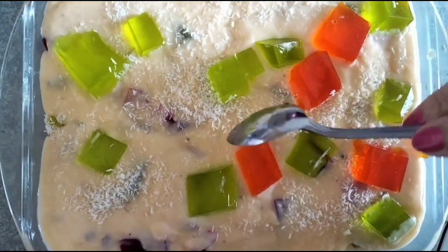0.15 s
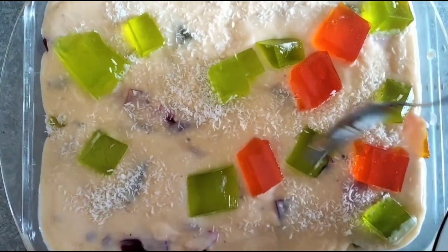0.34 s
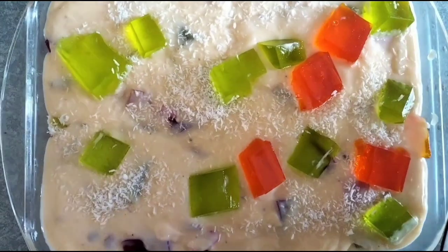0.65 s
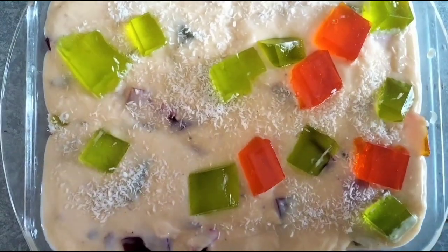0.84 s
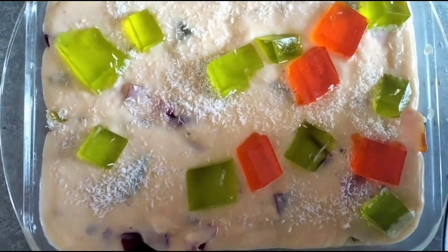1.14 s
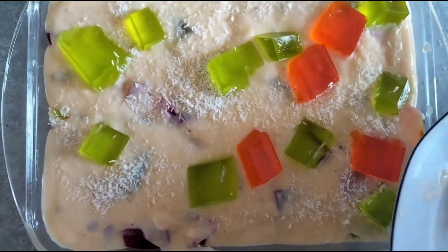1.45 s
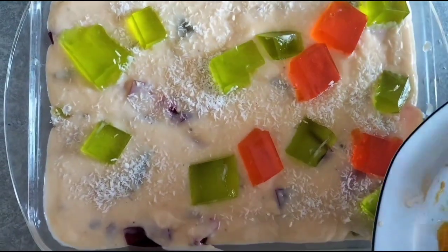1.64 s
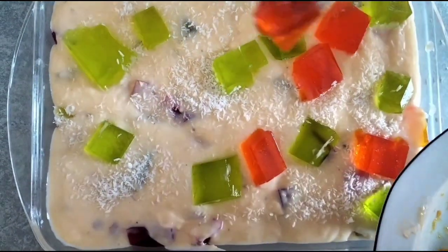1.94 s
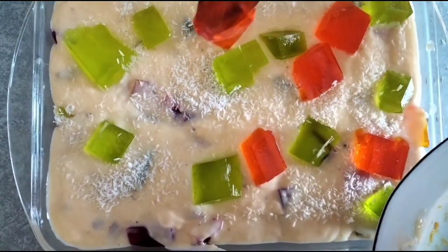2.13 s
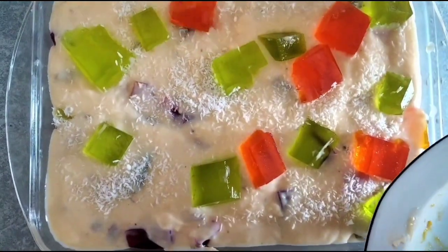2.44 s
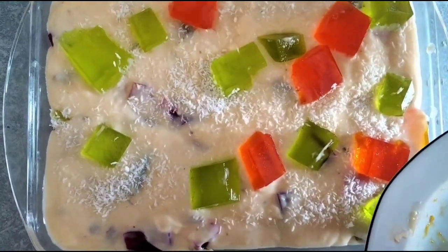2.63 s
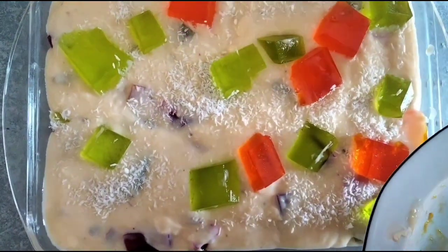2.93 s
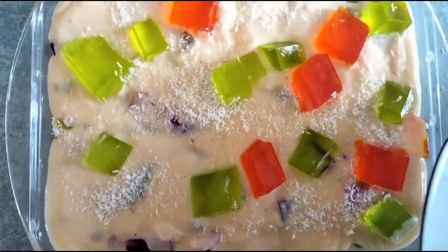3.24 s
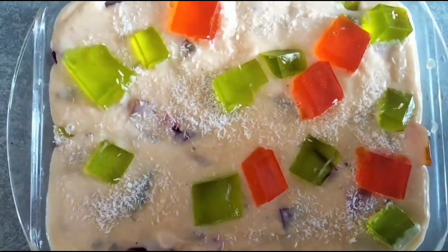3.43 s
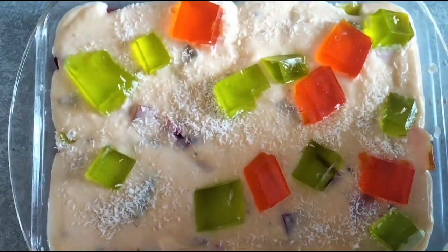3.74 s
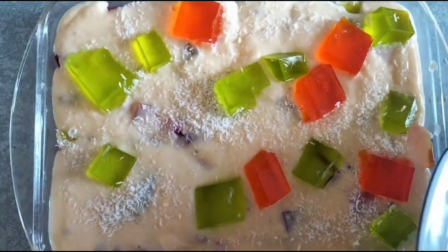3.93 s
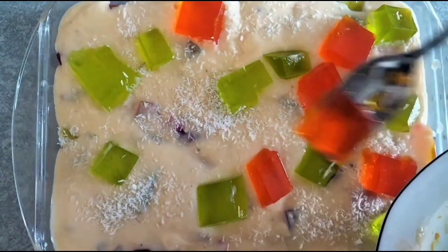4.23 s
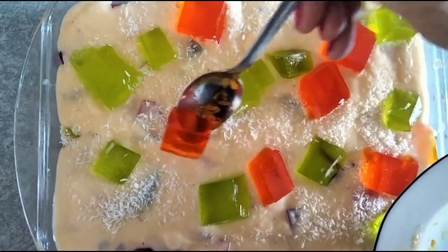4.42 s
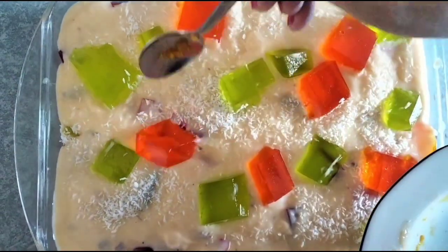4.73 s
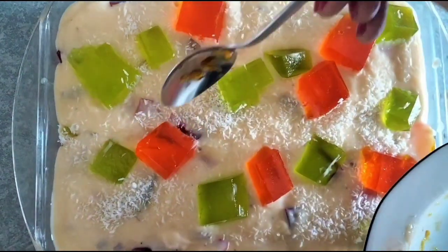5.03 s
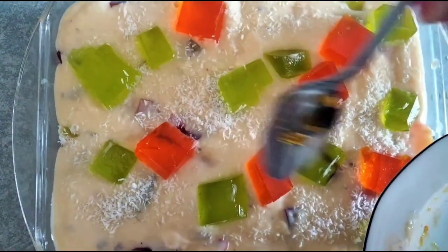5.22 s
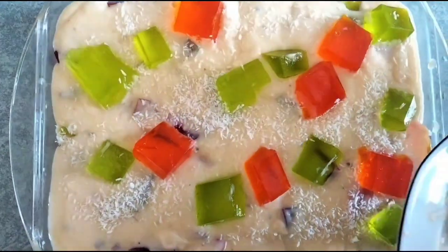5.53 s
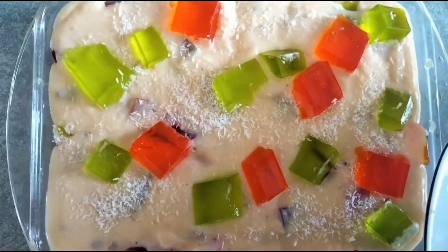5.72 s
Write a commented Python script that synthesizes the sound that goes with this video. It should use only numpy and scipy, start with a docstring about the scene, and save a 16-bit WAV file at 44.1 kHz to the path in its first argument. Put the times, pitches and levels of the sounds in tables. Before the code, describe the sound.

Short, bright spoon clinks against a dish, a close pair and later a single one, while a distant appliance hums quietly throughout.

```python
"""A steel spoon knocks three times on a glazed dish in a small kitchen, picking up jelly cubes.
Each contact is a crack of coloured noise plus ringing modes, damped quickly by the food and the hand.
Light bounces follow, the tip drags in small slips, and a cube slides off as one soft swelling tone.
Late on, a few low handling bumps reach the microphone. From across the room an appliance whirs
throughout, made of resonant noise; decaying noise bands give the kitchen's reflections."""
import sys
import numpy as np
from scipy import signal
from scipy.fft import rfft, irfft, next_fast_len
from scipy.io import wavfile

SR = 44100
rng = np.random.default_rng(int(sys.argv[2]) if len(sys.argv) > 2 else 0)


def log_audio(samples):
    """Write samples as a 16-bit WAV file to the path given in sys.argv[1]."""
    # one column per channel
    frames = np.atleast_2d(samples).T
    # limit to full scale, then quantise
    limited = np.clip(frames, -1, 1)
    pcm = np.round(limited * 32767).astype(np.int16)
    wavfile.write(sys.argv[1], SR, pcm)


N = 258867

# firm knocks of spoon on dish:
# (t/s, relative level/dB, part of the spoon, share of the free ring time, relative crack level/dB)
FIRM_KNOCKS = [(1.265, -0.5, "edge", 0.9, -22), (1.5077, 1.5, "back", 0.55, -33),
               (3.7934, -1.5, "tip", 0.94, -19.5)]
# all three land near one spot, which favours modes around one pitch
KNOCK_SPOT_HZ, KNOCK_SPOT_BOOST_DB = 3890, 2.5


def knocks():
    """The spoon meets the dish firmly with its edge, back or tip."""
    out = np.zeros(N)
    for start_s, strength_db, part, ring_share, crack_db in FIRM_KNOCKS:
        knock = clink(part, ring_share, crack_db, KNOCK_SPOT_HZ, KNOCK_SPOT_BOOST_DB)
        add(out, start_s, from_db(strength_db) * knock)
    return out


# the loosely held spoon falls back on the dish:
# (t/s, relative level/dB, part of the spoon, share of the free ring time, relative crack level/dB,
#  pitch favoured by the touched spot f/Hz)
LIGHT_BOUNCES = [(1.333, -15, "edge", 0.84, -37, 3434), (1.4338, -35, "back", 0.95, -20.5, 4480),
                 (1.6190, -27, "back", 0.74, -32, 3940), (1.6262, -22.5, "back", 0.48, -35, 2380),
                 (4.0475, -40, "edge", 0.65, -16, 9400), (4.0628, -36.5, "edge", 0.96, -16, 2370)]
BOUNCE_CRACK_T60_S, BOUNCE_SPOT_BOOST_DB = 0.047, 17.5


def bounces():
    """Light touches start more softly than knocks and wake mainly the modes of the touched spot."""
    out = np.zeros(N)
    for start_s, strength_db, part, ring_share, crack_db, spot_hz in LIGHT_BOUNCES:
        touch = clink(part, ring_share, crack_db, spot_hz, BOUNCE_SPOT_BOOST_DB,
                      rise_s=0.0015, crack_t60_s=BOUNCE_CRACK_T60_S)
        add(out, start_s, from_db(strength_db) * touch)
    return out


DRAG_START_S, DRAG_LENGTH_S, DRAG_DB = 3.930, 0.1, -38
SLIP_RING_SHARE, SLIP_CRACK_DB = 0.74, -23
SLIP_SPOT_HZ, SLIP_SPOT_BOOST_DB = 2370, 21.5   # the slips bring out one low mode
SLIP_JITTER, SLIP_SPREAD_DB = 0.15, 0.8   # share of the gap between slips; scatter of their strength


def drag(count=10):
    """The tip sticks and slips over the glaze at an uneven pace; the small rings run together."""
    out = np.zeros(N)
    for k, (late, firm) in enumerate(rng.standard_normal((count, 2))):
        progress = (k + SLIP_JITTER * late) / count
        start_s = DRAG_START_S + DRAG_LENGTH_S * progress
        strength_db = DRAG_DB + SLIP_SPREAD_DB * firm
        slip = clink("tip", SLIP_RING_SHARE, SLIP_CRACK_DB, SLIP_SPOT_HZ, SLIP_SPOT_BOOST_DB,
                     rise_s=0.00091)
        add(out, start_s, from_db(strength_db) * slip)
    return out


# spoon and dish ringing together, before damping, detuning and the boost of the touched spot:
# (f/Hz, t60/s, relative level/dB by the spoon's edge, by its back, by its tip)
DISH_MODES = [ (745, 0.021, -36, -53, -28.5), (854, 0.071, -37.5, -38, -33), (1357, 0.022, -32, -32, -22.5),
              (1430, 0.068, -34.5, -41, -39), (1644, 0.023, -61, -30, -26), (1810, 0.043, -34, -36, -40),
              (2256, 0.17, -37, -40.5, -42.5), (2322, 0.081, -32, -35, -31), (2866, 0.035, -64, -47, -26),
              (2980, 0.031, -79, -53, -25), (3160, 0.041, -48.5, -47, -39), (3370, 0.14, -31.5, -35.5, -33),
              (3610, 0.052, -24, -21.5, -51), (3706, 0.023, -32, -12, -12.5), (3930, 0.072, -15, -31, -14),
              (4340, 0.045, -50.5, -25.5, -49.5), (4480, 0.059, -52, -61, -28),
              (4810, 0.037, -24, -32, -31.5), (5040, 0.03, -52.5, -46, -27.5), (5600, 0.041, -27, -29, -63),
              (6010, 0.045, -25.5, -35, -30), (6750, .03, -36, -57, -43), (6870, 0.073, -38, -43.5, -37.5),
              (6970, 0.099, -35, -39.5, -40.5), (8330, 0.039, -39, -62, -33),
              (8840, 0.052, -40, -51, -31.5), (8920, 0.052, -62.5, -55, -32.5), (9520, .04, -40, -71, -50),
              (13800, 0.012, -37, -64, -34.5), (14400, 0.015, -37, -60, -34)]
# colour of the crack of steel on glaze: (f/Hz, relative level/dB per Hz)
CRACK_COLOUR = [(100, -27.5), (350, -3), (560, -17), (820, -1), (1700, 0.5), (1980, -23.5), (2400, 7),
                (4200, -4.5), (6800, 0), (7600, -15.5), (8700, -8.5), (11000, -17), (14500, -19),
                (16000, -21)]
# crowded upper modes heard within the crack: (f/Hz, half width/Hz, boost level/dB)
CRACK_HUMPS = [(10560, 350, 6.5), (12100, 530, 8.5), (14300, 450, 4)]


def clink(part, ring_share, crack_db, spot_hz, spot_boost_db,
          rise_s=0.0012, crack_t60_s=0.023, spot_octaves=0.071, detune=0.0014):
    """One contact: a brief crack, and every mode dying at its own pace."""
    t = np.arange(SR // 2) / SR
    hz, t60_s, *levels = np.transpose(DISH_MODES)
    level_db = dict(zip(("edge", "back", "tip"), levels))[part]

    # modes that swing widest at the touched spot take more of the blow
    octaves_away = np.log2(hz / spot_hz)
    level_db = level_db + spot_boost_db * np.exp(-(octaves_away / spot_octaves) ** 2)

    # grip and food load the pair a little differently every time
    hz = hz * (1 + detune * rng.standard_normal(len(hz)))
    phase_turns = rng.random((len(hz), 1))
    swing = np.sin(2 * np.pi * (hz[:, None] * t + phase_turns))
    ring = from_db(level_db) @ (swing * decay(t, t60_s[:, None] * ring_share))

    crack = noise(CRACK_COLOUR, size=len(t), resonances=CRACK_HUMPS) * decay(t, crack_t60_s)
    onset = 1 - np.exp(-t / rise_s)
    return (ring + from_db(crack_db) * crack) * onset


def spoon():
    """Knocks, bounces and the little slips of the dragging spoon."""
    return knocks() + bounces() + drag()


# a jelly cube slides off the spoon: (t/s of the swell's middle, level/dB, f/Hz, length/s)
JELLY_PLOPS = [(4.443, -58.5, 1076, 0.012)]


def jelly():
    """The cube's soft contact swells and fades on one pitch."""
    return soft_blows(JELLY_PLOPS)


# handling bumps at the microphone: (t/s of the swell's middle, level/dB, f/Hz, length/s)
HANDLING_BUMPS = [(4.911, -52.5, 83, 0.013), (4.918, -53.5, 144, 0.018), (4.952, -51.5, 121, 0.016),
                  (5.036, -61, 81.5, 0.015), (5.445, -60, 78, 0.035)]


def handling():
    """Low, soft bumps that reach the microphone without any crack."""
    return soft_blows(HANDLING_BUMPS)


def soft_blows(rows):
    """Soft contacts have no crack: a single pitch swells and fades."""
    t = np.arange(N) / SR
    out = np.zeros(N)
    for middle_s, level_db, hz, length_s in rows:
        swell = np.exp(-((t - middle_s) / length_s) ** 2)
        out += from_db(level_db) * swell * np.sin(2 * np.pi * hz * (t - middle_s))
    return out


# broad colour of the background air: (f/Hz, relative level/dB per Hz)
AIR_COLOUR = [(25, -22.5), (60, -15), (140, -2), (260, -3), (520, -9.5), (900, -6.5), (1700, -10),
              (2100, -12.5), (3000, -17.5), (4800, -15.5), (6500, -28), (8500, -34.5), (11200, -43.5),
              (15500, -42.5)]
# resonances in the whir: (f/Hz, half width/Hz, boost level/dB)
WHIR_RESONANCES = [(199.2, 5.1, 10), (307, 5.6, 7), (728, 38, 5), (1341, 8.3, 11), (1412, 31, 7),
                   (1511, 22.3, 7), (1558, 170, 7.5), (1565, 17, 5.5), (3688, 248, 12), (4370, 403, 9),
                   (5635, 310, 11.5), (7285, 280, 10.5), (9140, 130, 7.5), (10670, 220, 10),
                   (12050, 460, 11), (13200, 350, 9.5)]
APPLIANCE_RMS_DB = -61


def appliance(room_db=3.5):
    """A steady whir from across the kitchen, mixed with its diffuse reverberation."""
    whir = noise(AIR_COLOUR, size=N, resonances=WHIR_RESONANCES)
    in_room = whir + from_db(room_db) * kitchen(whir)
    return from_db(APPLIANCE_RMS_DB) * rms_one(in_room)


# reverberation of the small kitchen: (f/Hz, t60/s)
KITCHEN_T60 = [(300, 0.23), (1500, 0.25), (4000, 0.26), (8000, 0.26), (15000, 0.21)]


def kitchen(x, wet_db=-11.5, first_wall_s=0.0095, build_s=0.00085):
    """Reflections thicken after the nearest wall and die sooner in the extreme treble."""
    t = np.arange(SR // 2) / SR
    edges_hz = np.geomspace(100, 18000, 9)
    white = rng.standard_normal((2, len(t)))
    tail = np.zeros(len(t))
    for k, (low, high) in enumerate(zip(edges_hz, edges_hz[1:])):
        band_pass = signal.butter(2, [low, high], "band", fs=SR, output="sos")
        band = signal.sosfilt(band_pass, white[k % 2])   # neighbouring bands use separate noise
        tail += band * decay(t, at_hz(KITCHEN_T60, np.sqrt(low * high)))
    # silent until the first wall answers
    tail *= 1 - np.exp(-np.maximum(t - first_wall_s, 0) / build_s)
    return from_db(wet_db) * signal.fftconvolve(x, tail / np.linalg.norm(tail))[:N]


def noise(spectrum, size, resonances=()):
    """Noise of rms 1 with a broad colour and resonant humps."""
    padded = next_fast_len(size)
    hz = np.arange(padded // 2 + 1) * SR / padded
    colour_db = at_hz(spectrum, hz)
    for centre_hz, width_hz, hump_db in resonances:
        colour_db = colour_db + hump_db * np.exp(-((hz - centre_hz) / width_hz) ** 2)
    white = rfft(rng.standard_normal(padded))
    return rms_one(irfft(white * from_db(colour_db), padded)[:size])


def decay(t, t60_s):
    """Exponential fade that falls 60 dB in t60_s."""
    return np.exp(-np.log(1000) * t / t60_s)


def from_db(db):
    """Decibels to gain."""
    return 10 ** (np.asarray(db) / 20)


def rms_one(x):
    """Scale to unit rms."""
    return x / np.sqrt(np.mean(x ** 2) + 1e-20)


def at_hz(points, hz):
    """Read a table on a log-frequency axis."""
    points = np.array(points)
    return np.interp(np.log(np.maximum(hz, 1)), np.log(points[:, 0]), points[:, 1])


def add(out, start_s, sound):
    """Mix a sound in at a time."""
    i = int(round(start_s * SR))
    out[i:i + len(sound)] += sound[:N - i]


def scene():
    """Spoon and dish in their room, the jelly and the handling, over the steady whir."""
    clinks = spoon()
    return (clinks + kitchen(clinks) + jelly() + handling() + appliance())[None]


CUTOFF_HZ = 15700


def record(dry):
    """The microphone signal loses its top steeply above the cutoff."""
    low_pass = signal.ellip(10, .1, 80, CUTOFF_HZ, fs=SR, output="sos")
    return signal.sosfilt(low_pass, dry)


dry = scene()
out = record(dry)
log_audio(out)
```